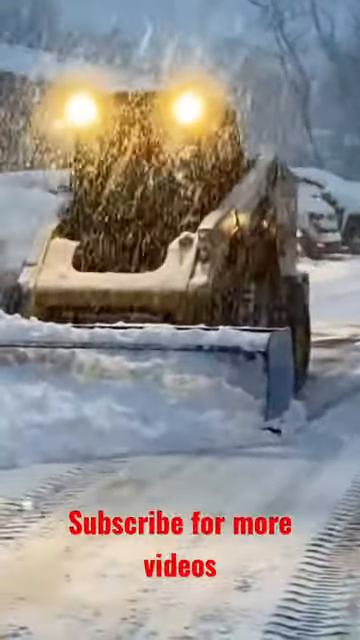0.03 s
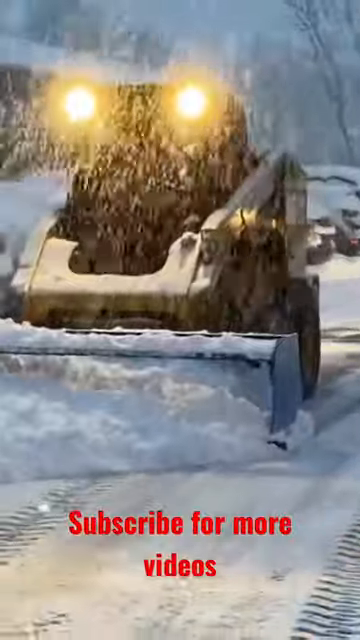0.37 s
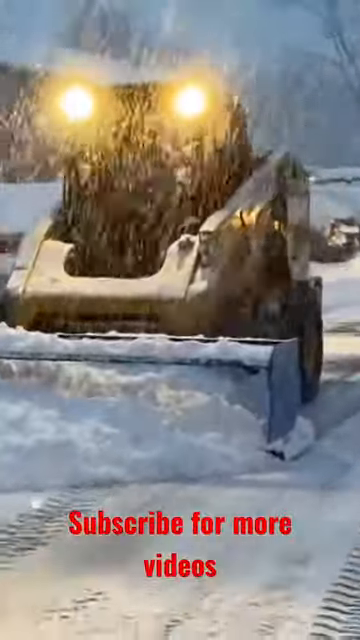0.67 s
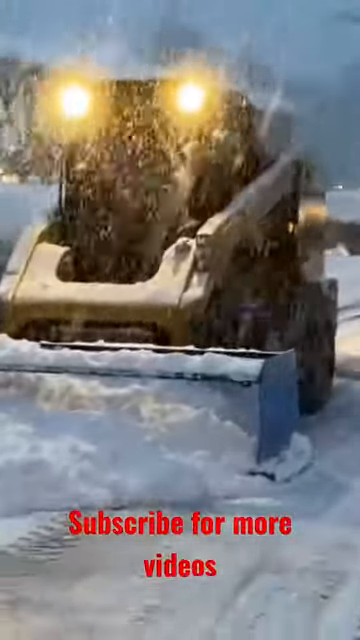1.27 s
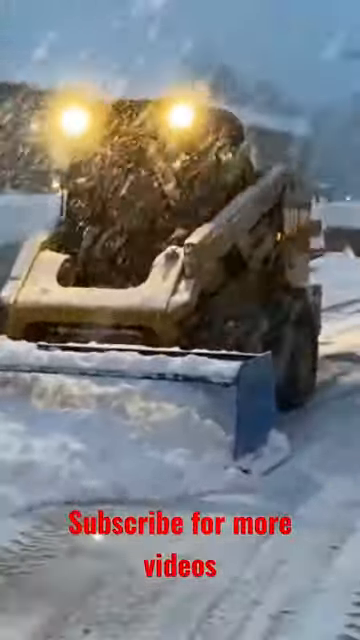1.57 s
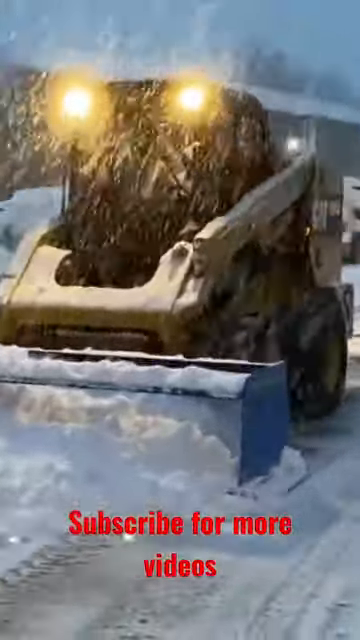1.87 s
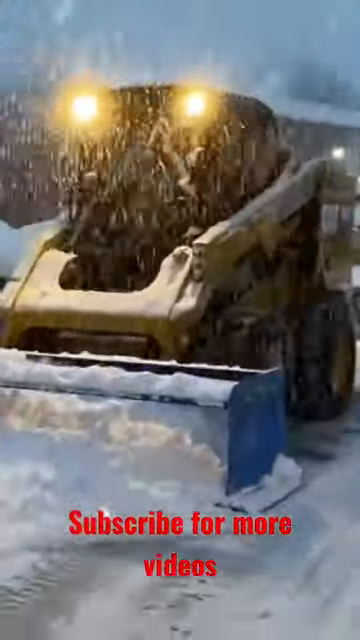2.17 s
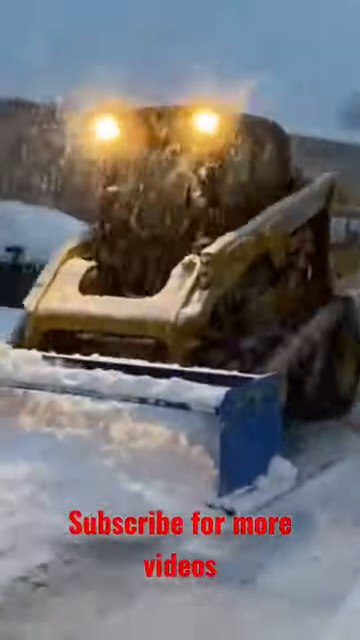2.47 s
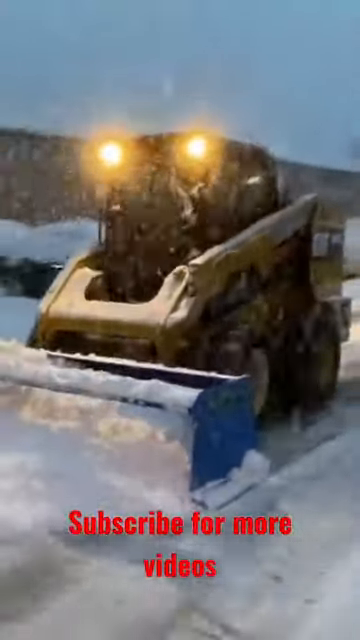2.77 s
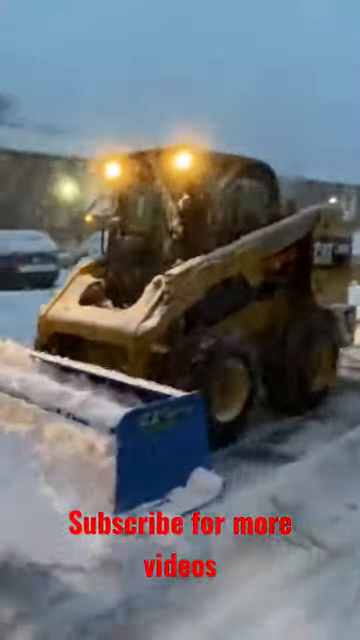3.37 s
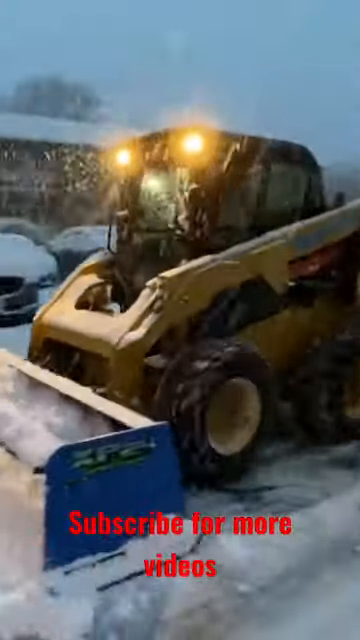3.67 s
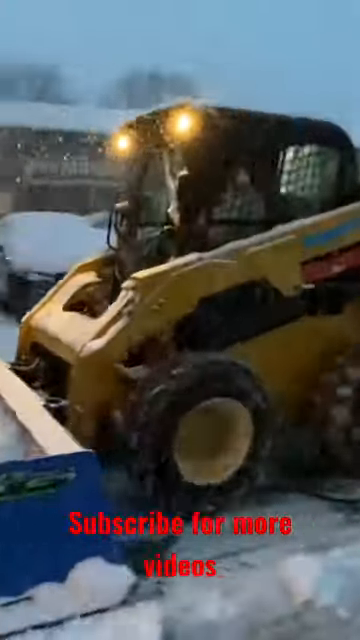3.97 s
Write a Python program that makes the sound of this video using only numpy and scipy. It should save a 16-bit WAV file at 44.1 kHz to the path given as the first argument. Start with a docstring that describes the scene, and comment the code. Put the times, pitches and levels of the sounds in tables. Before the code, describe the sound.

The steady diesel rumble of a small loader plowing snow outdoors draws nearer to the microphone. Blade scraping, snow creaking under the tyres and a pump whine grow louder, with a few dull judders near the end.

```python
"""A diesel drone over rough exhaust and clatter: a skid steer pushing snow across an open lot.
It comes closer to the microphones and draws up slightly to the right, its four cylinders at nearly
steady speed. The nine-piston hydraulic pump and the drive whine more as its side turns to us,
while the blade scrapes and crunches through snow. Buildings return a few faint, dull echoes."""
import sys
import numpy as np
from scipy import signal
from scipy.fft import rfft, irfft
from scipy.io import wavfile

SR = 44100
rng = np.random.default_rng(int(sys.argv[2]) if len(sys.argv) > 2 else 0)


def generate_wav(signal):
    """Clip the signal to [-1, 1] and save it as 16-bit WAV at the path in sys.argv[1]."""
    frames = np.transpose(np.atleast_2d(signal))
    scaled = np.clip(frames, -1, 1) * 32767
    pcm = np.round(scaled).astype(np.int16)
    wavfile.write(sys.argv[1], SR, pcm)


N = 176400

# the machine from the microphones (time [s], nearness [0-1], left minus right [dB], left delay [ms])
PATH = [(0, 0.37, -2.5, 0), (2.0, 0.64, -2.5, 0), (2.35, 0.67, -4.5, 0), (2.7, 0.5, -10.5, 0.052),
        (3.4, 0.6, -12.5, 0.1), (4, 0.68, -15.5, 0.12)]


def from_db(db):
    return 10 ** (np.asarray(db) / 20)


def unit_rms(x):
    return x / np.sqrt(np.mean(x ** 2) + 1e-20)


def in_time(rows):
    """The columns of a curve, sample by sample."""
    times, *columns = np.transpose(rows)
    return [np.interp(np.arange(N) / SR, times, column) for column in columns]


def level(rows):
    """A dB curve as a gain."""
    return from_db(in_time(rows)[0])


def drift(rate_hz):
    """A random wander of spread 1, mostly slower than rate_hz."""
    hop, settle = 40, 2000
    pole = np.exp(-2 * np.pi * rate_hz * hop / SR)
    noise = rng.standard_normal(N // hop + settle + 2)
    slow = signal.lfilter([1], [1, -2 * pole, pole * pole], noise)[settle:]
    return np.interp(np.arange(N) / hop, np.arange(len(slow)), unit_rms(slow))


def coloured(x, spectrum):
    """Gives a signal a spectrum; rms 1."""
    hz, db = np.transpose(spectrum)
    f = np.arange(N // 2 + 1) * SR / N + 1e-3
    skirts = np.minimum(1, f / hz[0]) ** 2 * np.minimum(1, hz[-1] / f) ** 2
    gain = from_db(np.interp(np.log(f), np.log(hz), db))
    return unit_rms(irfft(rfft(x) * skirts * gain, N))


def resonance(x, hz, width_hz):
    """A steep-sided resonance; rms 1."""
    r = np.exp(-np.pi * width_hz * np.sqrt(2) / SR)
    section = [1, 0, -1, 1, -2 * r * np.cos(2 * np.pi * hz / SR), r * r]
    return unit_rms(signal.sosfilt([section, section], x))


def ring(x, modes):
    """Several resonances driven by one force; rms 1."""
    return unit_rms(sum(from_db(db) * resonance(x, hz, width) for hz, width, db in modes))


def tone(turns, order, waver_db, rate_hz, in_step=False):
    """A tone at order times crank speed, wavering in level and phase; in step, it starts at a trough."""
    start = 0 if in_step else rng.random()
    angle = 2 * np.pi * (order * turns + start) + waver_db * np.log(10) / 20 * drift(rate_hz)
    return unit_rms(-np.cos(angle) * from_db(waver_db * drift(rate_hz)))


def order_tones(turns, table, waver_db, rate_hz):
    """Crank tones, rounded to half orders, each between its far and near level as the machine moves."""
    nearness = in_time(PATH)[0]
    return sum(from_db(far + (near - far) * nearness)
               * tone(turns, np.round(2 * order) / 2, waver_db, rate_hz) for order, far, near in table)


def firing_gate(turns, decay, depth):
    """A burst at each firing, twice a turn; decay is a share of the gap between firings."""
    # strength of each cylinder (level [dB])
    cylinder_db = [3, -2.5, 1, -1]
    strength = from_db(cylinder_db)[(2 * turns).astype(int) % len(cylinder_db)]
    return unit_rms(1 + depth * strength * np.exp(-(2 * turns % 1) / decay))


def grains(per_s, spread_db):
    """Random little clicks, their sizes scattered by spread_db; rms 1."""
    sizes = from_db(spread_db * np.minimum(rng.exponential(1, N), 4)) * rng.choice([-1, 1], N)
    return unit_rms(sizes * (rng.random(N) < per_s / SR))


def placed(x, pan, lag, offset_db=0):
    """A source at the two microphones; pan and lag scale the path's level difference and delay."""
    _, pan_db, lag_ms = in_time(PATH)
    delayed = np.arange(N) - lag * lag_ms * SR / 1000
    left = np.interp(2 * delayed, np.arange(2 * N), signal.resample_poly(x, 2, 1))
    gain = from_db((pan * pan_db + offset_db) / 2)
    return np.array([left * gain, x / gain])


def widening(source, lag):
    """Blade noise, centred at first, widening to both sides after 2.2 s."""
    # sound that differs between left and right (time [s], amplitude share [0-1])
    spread = [(0, 0), (2.2, 0), (2.7, 0.5), (4, 0.71)]
    width = in_time(spread)[0]
    centre, left, right = source(), source(), source()
    return np.sqrt(1 - width ** 2) * placed(centre, pan=0.02, lag=lag) + width * np.array([left, right])


def exhaust(turns):
    """The firing note, its neighbours and the rough puffs of gas."""
    # firing note, its octave and the puffs (time [s], level [dB])
    note_level = [(0, -27), (0.2, -25), (0.4, -26), (0.55, -24), (0.63, -22), (0.66, -29), (0.7, -23.5),
                  (0.85, -24), (1.3, -22.5), (1.95, -22), (2.5, -23.5), (3.05, -21.5), (3.5, -22),
                  (4, -22.0)]
    octave_level = [(0, -31.5), (0.3, -31.5), (1.2, -32.5), (1.42, -35.5), (1.65, -29), (2.05, -31),
                    (2.3, -27), (2.85, -33.5), (3.1, -32.5), (3.35, -33.5), (3.7, -27), (4, -27.5)]
    puff_level = [(0, -35.5), (1.2, -38.5), (1.8, -33), (3.1, -33), (3.3, -32), (4, -32.5)]
    # gas rumble (frequency [Hz], level [dB])
    spectrum = [(20, -7), (35, -5), (48, 3), (85, 7.5), (150, -0.5), (240, -3), (310, -1.5), (370, -11),
                (450, -30), (700, -21)]
    # other exhaust tones (order [per turn], far level [dB], near level [dB])
    orders = [(1.5, -35.5, -45), (2.5, -39.5, -50.5), (3, -63, -33), (3.5, -38.5, -40.5), (4.5, -73, -30),
              (5, -46.5, -50), (5.5, -48.5, -40.5), (6, -41.5, -39), (6.5, -53.5, -44.5), (7, -50.5, -49),
              (7.5, -67, -31.5), (8, -55, -50), (9.5, -64, -43.5)]
    note = level(note_level) * tone(turns, 2, waver_db=0.06, rate_hz=3.5, in_step=True)
    octave = level(octave_level) * tone(turns, 4, waver_db=0, rate_hz=2.8, in_step=True)
    gas = rng.standard_normal(N) * firing_gate(turns, decay=0.35, depth=3.6)
    puffs = level(puff_level) * coloured(gas, spectrum)
    neighbours = order_tones(turns, orders, waver_db=2, rate_hz=4)
    return placed(note + octave + neighbours + puffs, pan=0.18, lag=2.1, offset_db=0.9)


def clatter(turns):
    """Combustion knock rings the panels; valves and injectors tick at the same angles in every cycle."""
    # engine block and panels (frequency [Hz], width [Hz], level [dB])
    panels = [(550, 95, 0), (804, 78, -3), (927, 220, -0.5), (1290, 193, -3.5), (1504, 187, -2),
              (2004, 220, -9.5), (2710, 160, -13.5), (3240, 1150, -14.5)]
    # clatter (time [s], level [dB])
    loudness = [(0, -43), (1.2, -40.5), (2, -38.5), (2.65, -37.5), (3.2, -37.5), (3.6, -37.5), (4, -38)]
    slots = 96  # per two-turn cycle
    slot = (turns / 2 * slots).astype(int)
    ticks = np.diff(slot, prepend=0)
    knock = firing_gate(turns, decay=0.12, depth=2)
    ringing = 0
    for hz, width, db in panels:
        strength = rng.standard_normal(slots)[slot % slots] * from_db(3.85 * rng.standard_normal(N))
        force = 1.03 * unit_rms(ticks * strength) + knock * rng.standard_normal(N)
        ringing += from_db(db) * resonance(force, hz, width)
    return placed(level(loudness) * unit_rms(ringing), pan=0.57, lag=0.48)


def hydraulics(turns):
    """The pump's pistons, the drive and the gears whine in step with the crank."""
    # pump partials 1, 2 and 4, drive whine and gear hum (time [s], level [dB])
    piston_level = [(0, -35.5), (0.6, -37.5), (0.8, -42), (1.05, -39.5), (1.6, -38.5), (2.15, -41),
                    (2.6, -41), (3.2, -39.5), (3.65, -39), (3.82, -40), (4, -36)]
    octave_level = [(0, -48), (0.3, -56), (0.65, -46), (1, -45), (1.55, -45), (2.17, -46.5), (2.28, -33.5),
                    (2.45, -36.5), (2.65, -34), (2.95, -35), (3.2, -35.5), (3.6, -34), (3.7, -42),
                    (3.8, -33.5), (3.92, -32.5), (4, -42)]
    fourth_level = [(0, -61), (1.5, -54.5), (2.4, -61), (2.65, -46.5), (3.0, -52.5), (3.4, -55), (4, -58)]
    drive_level = [(0, -50), (0.25, -55.1), (0.55, -45.5), (1.1, -50), (1.5, -45), (1.8, -43),
                   (2.15, -42.5), (2.4, -50), (2.68, -38.5), (2.95, -44), (3.15, -49), (3.38, -42),
                   (3.48, -38.5), (3.62, -38), (3.76, -58), (4, -48)]
    hum_level = [(0, -52), (.6, -61), (1.4, -52.5), (2.1, -49.5), (2.4, -47.5), (3.2, -52), (3.75, -50.5),
                 (4, -40)]
    # faint gear and pump tones; rough pump overtones (order [per turn], far level [dB], near level [dB])
    faint_orders = [(16, -57, -62), (20, -76, -53), (23.5, -56.5, -49.5), (27, -52, -59),
                    (38.7, -68, -52.5), (44.44, -60.5, -57), (45.25, -59, -65)]
    rough_orders = [(54, -65, -58), (72, -64, -57), (81, -65, -54.5), (108, -71, -60), (124, -75, -66)]
    pistons = 9
    piston = level(piston_level) * tone(turns, pistons, waver_db=0.5, rate_hz=11)
    octave = level(octave_level) * from_db(-0.33) * tone(turns, 2 * pistons, waver_db=1.5, rate_hz=24)
    fourth = level(fourth_level) * tone(turns, 4 * pistons, waver_db=0.5, rate_hz=5)
    drive = level(drive_level) * tone(turns, order=24, waver_db=0, rate_hz=12)
    hum = level(hum_level) * tone(turns, order=12, waver_db=2.5, rate_hz=9.1)
    whines = order_tones(turns, faint_orders, waver_db=3.6, rate_hz=3.4)
    overtones = order_tones(turns, rough_orders, waver_db=3.8, rate_hz=55)
    return (placed(piston, pan=0.23, lag=0.87, offset_db=-1)
            + placed(octave, pan=0.43, lag=3.3, offset_db=-6.5)
            + placed(drive + hum + whines + fourth, pan=0.77, lag=0.37)
            + placed(overtones, pan=0.05, lag=0.35))


def blade_scrape():
    """The blade's edge scrapes over packed snow in dense little fractures."""
    # scraping (frequency [Hz], level [dB])
    spectrum = [(200, -17), (450, 3), (1000, -7), (2000, 1), (3000, 1.5), (4200, -4), (5500, -6),
                (7500, -17.5), (10000, -63), (16000, -30)]
    # scraping (time [s], level [dB])
    loudness = [(0, -51), (1, -48.5), (2, -45), (3.1, -44), (3.6, -39), (4, -41.5)]
    gain = level(loudness) * from_db(0.5 * drift(11))
    return gain * widening(lambda: coloured(grains(per_s=9000, spread_db=1.5), spectrum), lag=0.97)


def tyres():
    """Dull, dense creaks of snow packing under the treads, heard from both sides."""
    # creaking (frequency [Hz], level [dB])
    spectrum = [(70, 4.5), (150, 6.5), (300, -0.5), (450, -2), (750, -15.5), (1100, -11), (1500, -11),
                (2200, -53), (4000, -74)]
    # creaking (time [s], level [dB])
    loudness = [(0, -54), (1.2, -47.5), (2.1, -46), (2.6, -40), (3.2, -37.5), (4, -29)]
    creaks = [coloured(grains(per_s=3000, spread_db=1), spectrum) for _ in range(2)]
    return level(loudness) * np.array(creaks)


def oil_rush():
    """Oil rushes through the pump housing."""
    # oil flow (time [s], level [dB])
    loudness = [(0, -56), (1.2, -49), (2, -41), (2.6, -40.5), (3.1, -35), (3.5, -34.5), (4, -37.5)]
    rush = level(loudness) * resonance(rng.standard_normal(N), hz=666, width_hz=113)
    return placed(rush, pan=0.34, lag=0.085, offset_db=-3)


def engine_cover(turns):
    """The cover rings thinly at each firing."""
    # ringing (time [s], level [dB])
    loudness = [(0, -62), (1.05, -59), (1.28, -53.5), (1.65, -56), (2.1, -62), (2.35, -57), (2.6, -62),
                (3.1, -62), (3.5, -49), (4, -45)]
    knock = rng.standard_normal(N) * firing_gate(turns, decay=0.23, depth=1.7)
    return placed(level(loudness) * resonance(knock, hz=2780, width_hz=114), pan=0.05, lag=0.64)


def gear_growl(turns):
    """Under load the gear teeth ring the housing, at the same angles in every cycle."""
    # gear housing (frequency [Hz], width [Hz], level [dB])
    modes = [(1250, 68, -2), (1348, 56, 6), (1526, 120, 4.5)]
    # growl (time [s], level [dB])
    loudness = [(0, -58), (1.5, -60), (2.3, -48), (2.62, -43), (3.0, -48.5), (3.3, -41.5), (3.7, -47),
                (4, -52)]
    slots = 192  # per two-turn cycle
    slot = (turns / 2 * slots).astype(int)
    teeth = np.diff(slot, prepend=0) * rng.choice([-1, 1], slots)[slot % slots]
    strength = from_db(3.9 * rng.standard_normal(N))
    return placed(level(loudness) * ring(teeth * strength, modes), pan=0.15, lag=1.9)


def grit():
    """The edge bites through to the pavement in gritty spurts that ring the steel."""
    # cutting edge (frequency [Hz], width [Hz], level [dB])
    modes = [(2074, 270, 0.5), (3160, 230, 1.5), (3740, 380, 1)]
    # grinding (time [s], level [dB])
    loudness = [(0, -63), (1.5, -67), (2.2, -56), (2.7, -48), (3.0, -45.5), (3.35, -45.5), (3.55, -51),
                (4, -60)]

    def bite():
        return ring(grains(per_s=1100, spread_db=2) * from_db(2 * drift(25)), modes)
    return level(loudness) * widening(bite, lag=0.68)


def crunch_and_hiss():
    """Loose snow crumbles off the blade. Separately, a thin hiss above 7 kHz differs between left and right."""
    # crunch and hiss (frequency [Hz], level [dB])
    crunch_spectrum = [(1500, -8), (4000, 6.5), (7000, 3), (9000, -9), (11500, -7.5), (13000, -25),
                       (16000, -10)]
    hiss_spectrum = [(5000, -72), (7500, 5), (9000, -8.5), (11000, 4.5), (12500, -6), (13500, -5.5),
                     (16000, -2)]
    # crunch and hiss (time [s], level [dB])
    crunch_level = [(0, -82), (1, -67.5), (2, -63), (2.7, -51.5), (3.2, -44.5), (3.6, -42.5), (4, -39)]
    hiss_level = [(0, -67.5), (1, -64), (2, -59), (2.7, -57), (3.2, -56), (4, -48)]
    crunch_gain = level(crunch_level) * from_db(1.2 * drift(21))
    crunch = widening(lambda: coloured(grains(per_s=7000, spread_db=1), crunch_spectrum), lag=0.97)
    hiss_gain = level(hiss_level) * from_db(1.3 * drift(13))
    hiss = np.array([coloured(grains(per_s=7000, spread_db=0), hiss_spectrum) for _ in range(2)])
    return crunch_gain * crunch + hiss_gain * hiss


def judder():
    """The blade and tyres judder over ridges, close by."""
    # ridges (time [s], half-length [s], level [dB])
    ridges = [(3.33, 0.042, -27.5), (3.626, 0.14, -35.5), (3.963, 0.099, -31.5)]
    # shaking (frequency [Hz], level [dB])
    spectrum = [(40, -22), (110, 6), (180, -2), (300, -1), (480, -9.5), (700, -17), (1400, -18),
                (2500, -57)]
    t = np.arange(N) / SR
    swell = sum(from_db(db) * np.exp(-((t - at) / half) ** 2) for at, half, db in ridges)
    return placed(swell * coloured(rng.standard_normal(N), spectrum), pan=0.56, lag=0.44)


def side_rasp():
    """The drive rasps as its side comes round to the microphones."""
    # rasp bands (frequency [Hz], width [Hz], level [dB])
    bands = [(1690, 250, -49), (2320, 310, -46.5)]
    # their swell (time [s], gain [dB])
    swell = [(0, -64), (3.1, -30), (3.45, -7), (3.65, 0), (4, 7)]
    rasp = sum(from_db(db) * resonance(rng.standard_normal((2, N)), hz, width) for hz, width, db in bands)
    return level(swell) * rasp


def side_whines(turns):
    """High tones, rounded to half orders, swell in as the machine turns side-on."""
    # whines (order [per turn], level [dB], middle of the swell [s])
    orders = [(20.5, -40, 3.8), (48, -45, 3.85), (52.5, -48, 3.87), (54, -46, 3.88), (63.5, -53, 3.8),
              (72, -45, 3.63), (81.5, -52, 3.55), (125, -59, 3.65)]
    t, swell_s = np.arange(N) / SR, 0.041
    whines = 0
    for order, db, at in orders:
        swell = (1 + np.tanh((t - at) / swell_s)) / 2
        whines += from_db(db) * swell * tone(turns, np.round(2 * order) / 2, waver_db=2.8, rate_hz=18)
    return placed(whines, pan=0.05, lag=0.35)


def lot_echoes(x):
    """A few dull echoes from the buildings round the lot."""
    # walls (left delay [s], right delay [s])
    walls = [(0.024, .031), (0.049, .059), (0.083, .071)]
    n = np.arange(N)
    onset = np.minimum(1, n / (0.026 * SR))
    dull = signal.sosfilt(signal.butter(2, 1100, fs=SR, output="sos"), x.mean(0) * onset)
    return sum(np.array([np.interp(n - delay * SR, n, dull, left=0) for delay in wall]) for wall in walls)


def scene():
    """One crank times the engine, pump and gears; all but the exhaust echoes round the lot."""
    # crank (time [s], speed [turns/s])
    speed = [(0, 34.7), (.25, 34.65), (.45, 34.45), (.7, 34.05), (1.3, 34.0), (1.5, 34.2), (1.95, 34.2),
             (2.12, 33.8), (2.3, 34.15), (2.42, 34.0), (2.6, 34.32), (2.85, 34.2), (3.0, 34.0),
             (3.55, 33.97), (3.78, 33.55), (4, 33.55)]
    turns = np.cumsum(in_time(speed)[0]) / SR
    machine = clatter(turns) + gear_growl(turns) + engine_cover(turns) + side_rasp()
    machine += hydraulics(turns) + side_whines(turns) + oil_rush()
    machine += blade_scrape() + crunch_and_hiss() + judder() + grit() + tyres()
    return exhaust(turns) + machine + from_db(-23) * lot_echoes(machine)


def record(dry):
    """The microphone pair fades in softly and loses the highest treble."""
    fade_s, stopband_hz = 0.005, 16600
    fade = np.sin(np.pi / 2 * np.minimum(1, np.arange(N) / (fade_s * SR))) ** 2
    return signal.sosfilt(signal.cheby2(14, 70, stopband_hz, fs=SR, output="sos"), dry * fade)


dry = scene()
out = record(dry)
generate_wav(out)
```